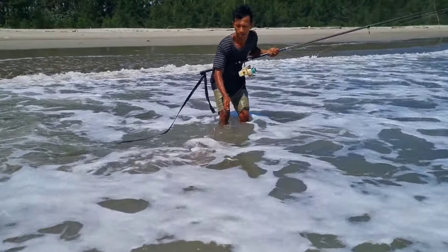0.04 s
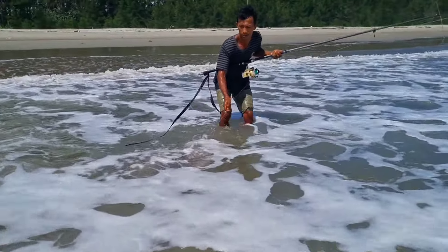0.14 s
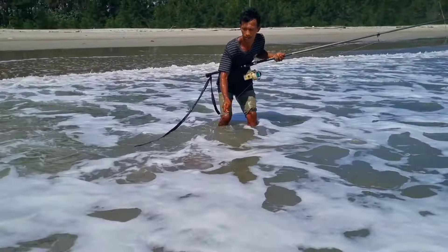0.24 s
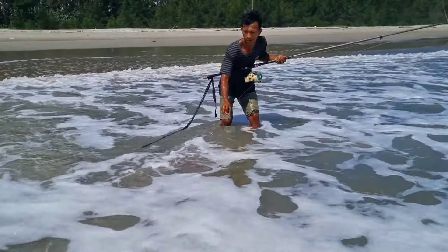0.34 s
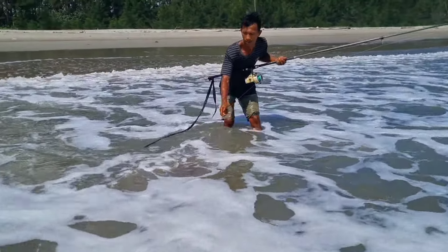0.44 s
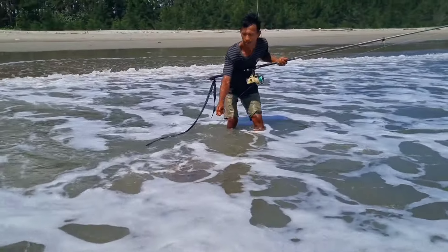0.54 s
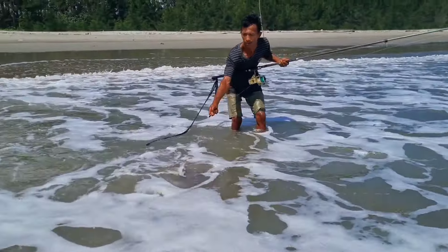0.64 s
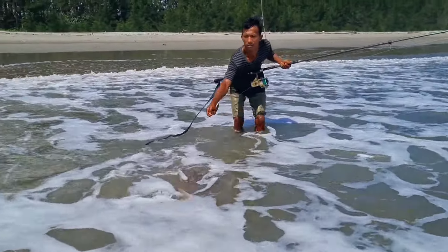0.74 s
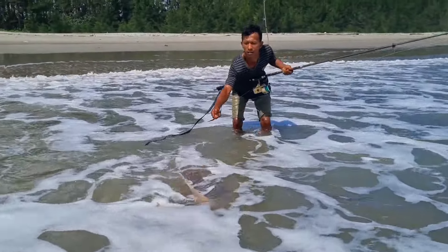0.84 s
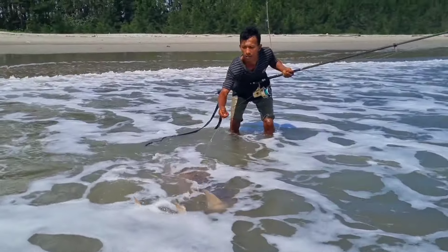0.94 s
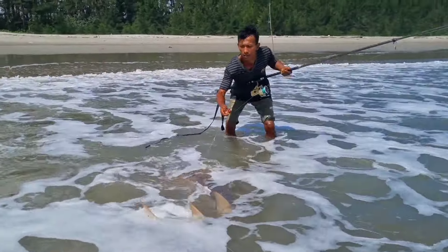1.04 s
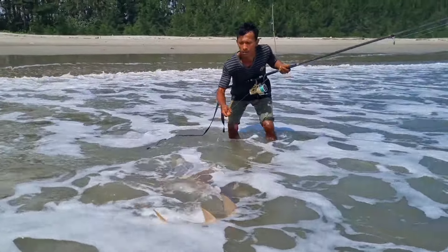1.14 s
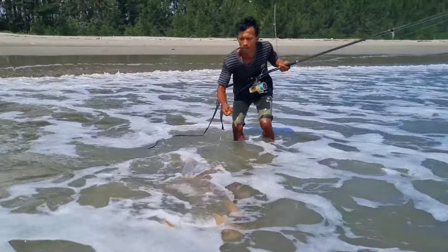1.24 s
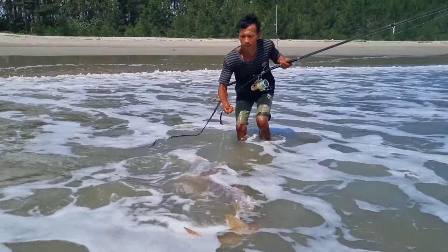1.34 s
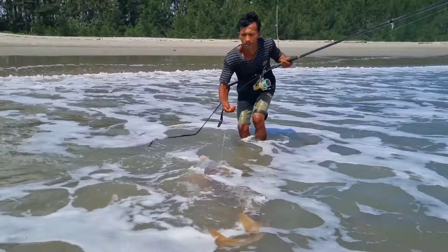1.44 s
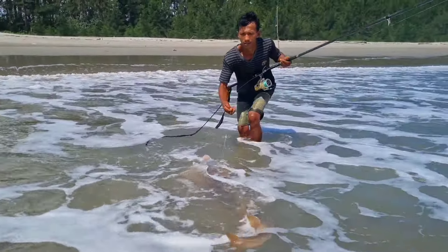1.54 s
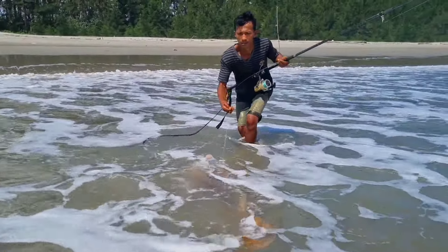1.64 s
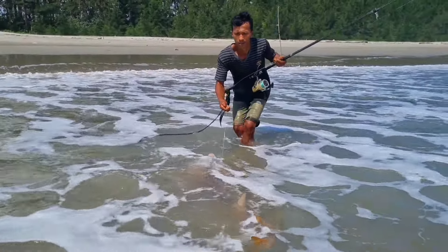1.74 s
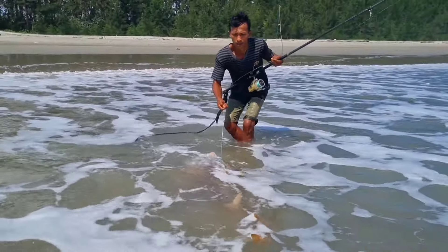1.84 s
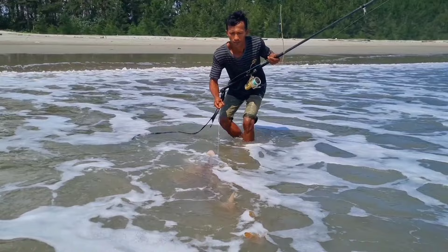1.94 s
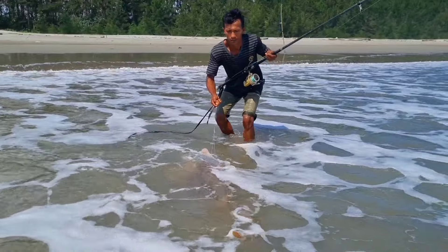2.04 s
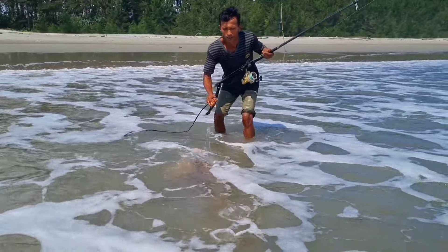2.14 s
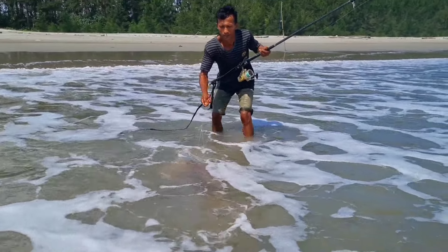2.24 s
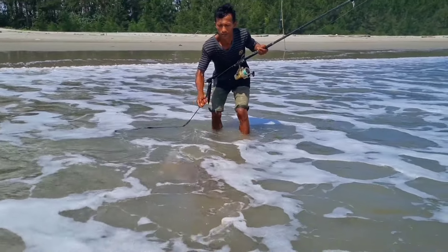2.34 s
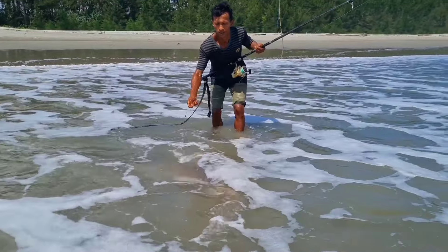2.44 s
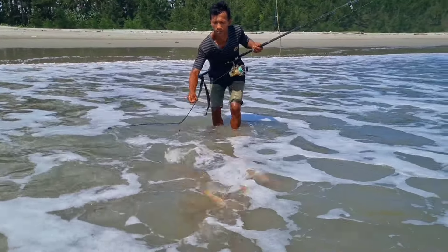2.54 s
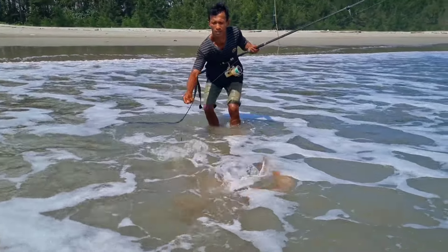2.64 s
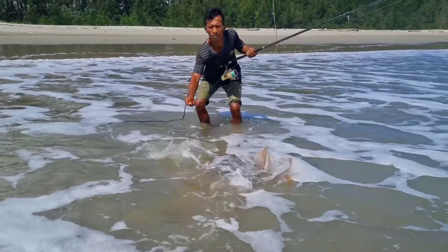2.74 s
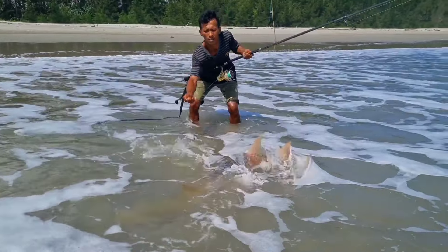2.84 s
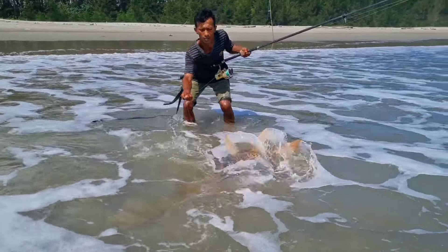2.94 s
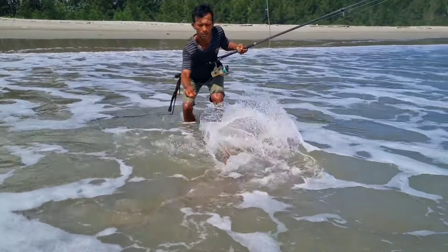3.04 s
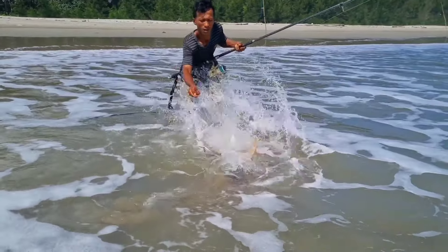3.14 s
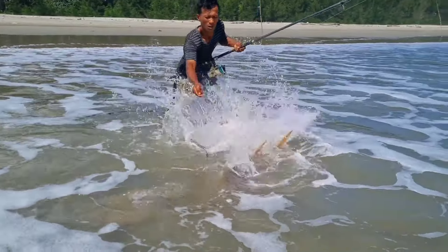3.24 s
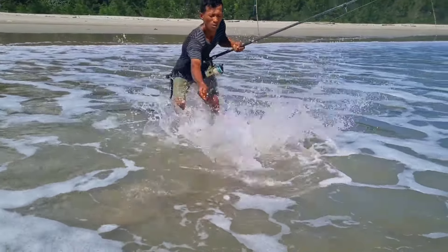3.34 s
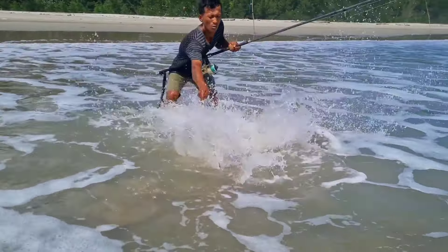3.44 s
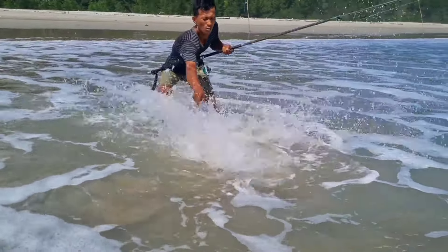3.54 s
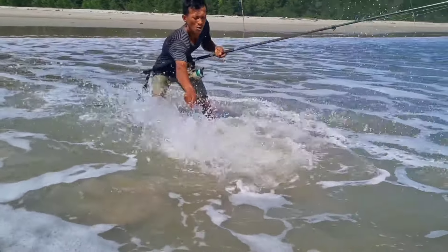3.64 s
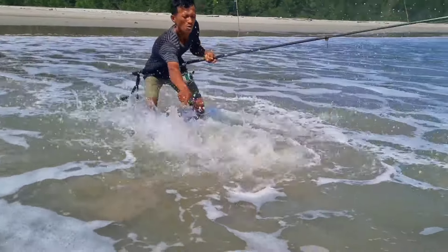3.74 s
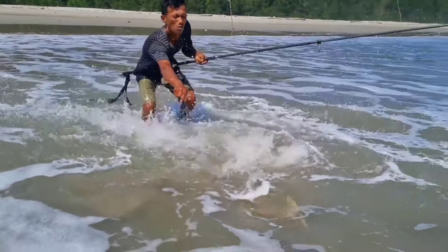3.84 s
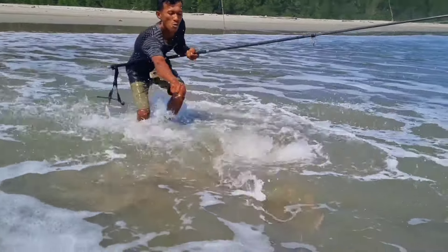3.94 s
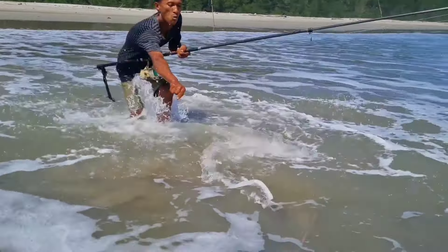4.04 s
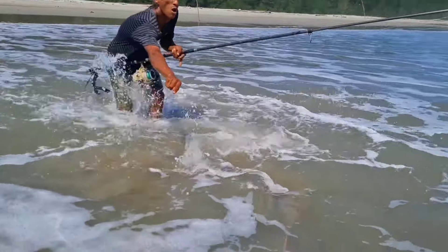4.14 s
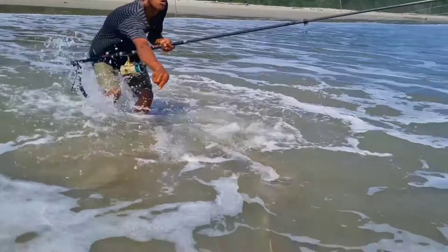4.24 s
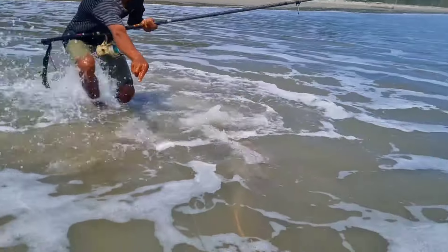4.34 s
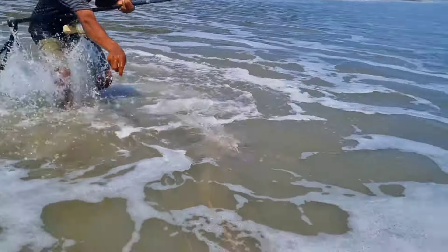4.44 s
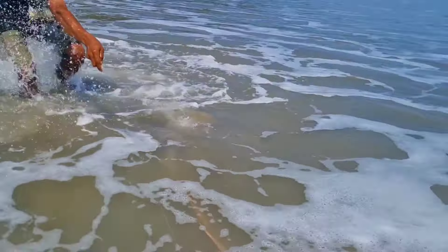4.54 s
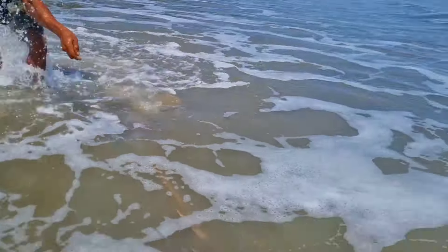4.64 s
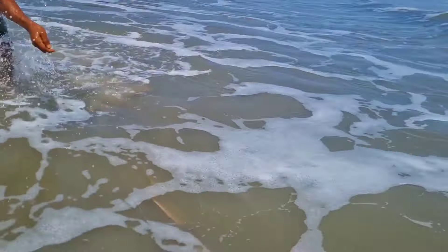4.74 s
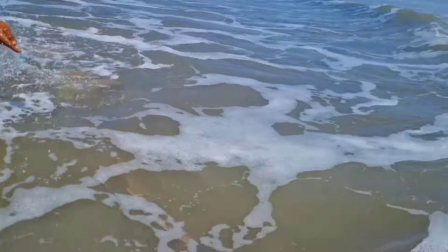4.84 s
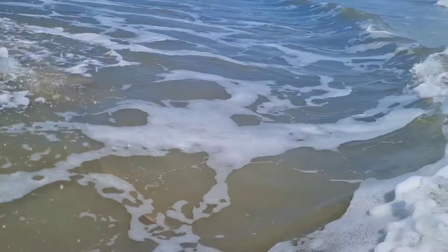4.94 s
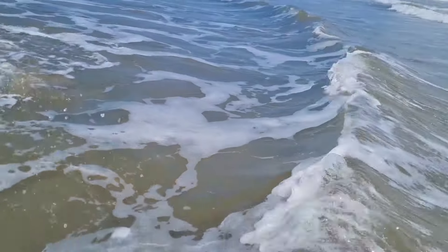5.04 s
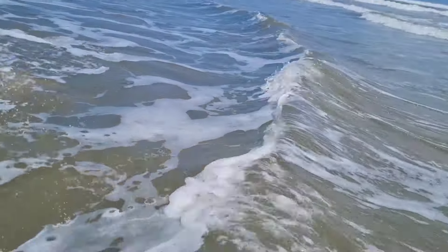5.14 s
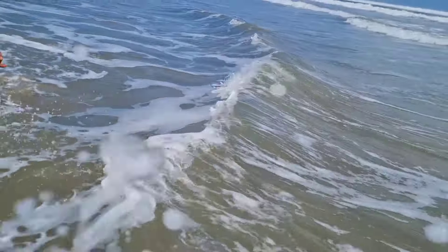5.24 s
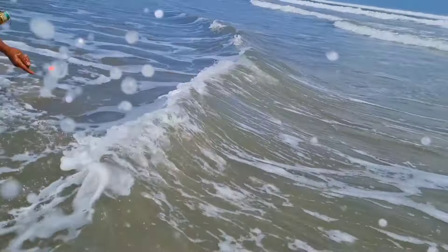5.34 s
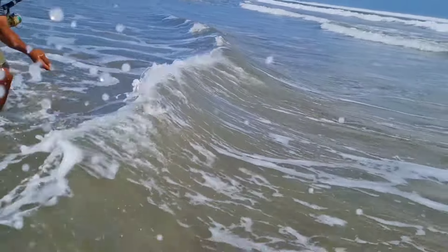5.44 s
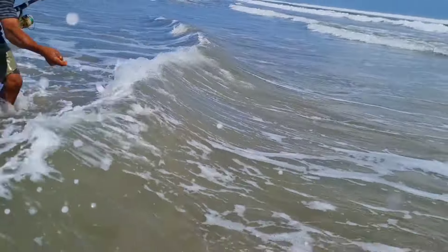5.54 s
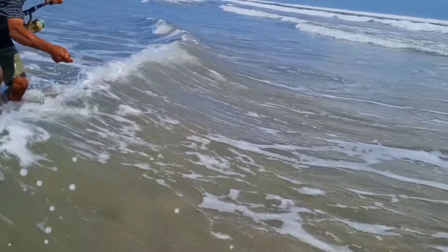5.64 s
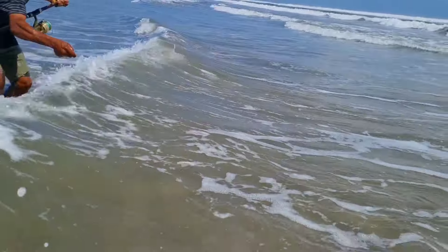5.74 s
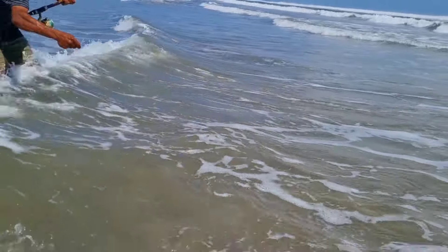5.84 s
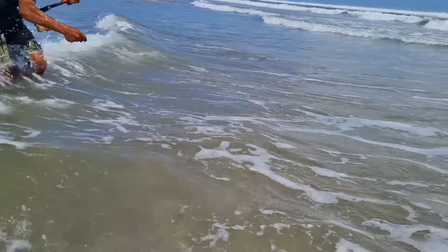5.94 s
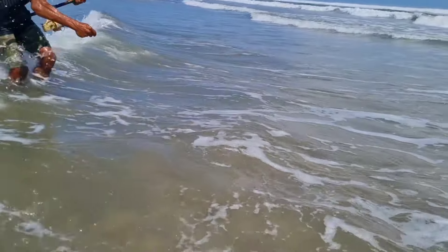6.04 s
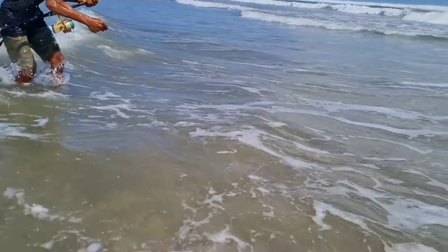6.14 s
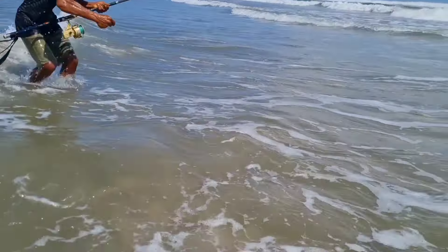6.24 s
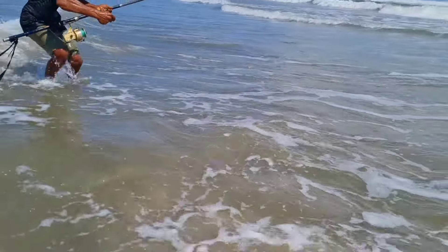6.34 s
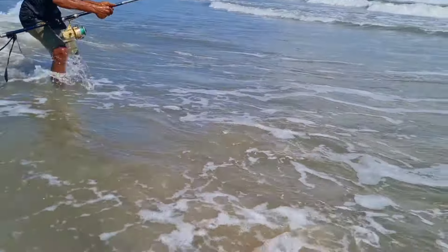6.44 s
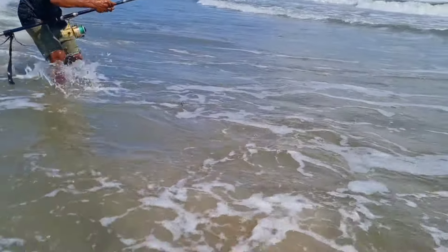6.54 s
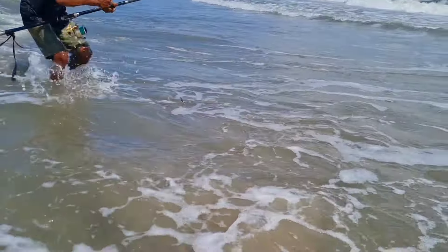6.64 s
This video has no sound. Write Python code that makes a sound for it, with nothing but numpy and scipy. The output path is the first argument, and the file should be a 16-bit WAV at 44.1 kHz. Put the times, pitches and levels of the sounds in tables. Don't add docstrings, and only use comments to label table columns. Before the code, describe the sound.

On an open beach, gusty wind rumbles and thuds on a close handheld stereo microphone over the low roar of distant breakers and fizzing foam. A few watery glugs come early, then a lull of mostly wind. From about three seconds a big fish thrashes nearby with splashes, plops and hissing spray, growing denser and closer to the end.

```python
import sys
import numpy as np
from scipy import signal
from scipy.fft import rfft, irfft, next_fast_len
from scipy.io import wavfile
from scipy.ndimage import uniform_filter1d, map_coordinates

SR = 44100
rng = np.random.default_rng(int(sys.argv[2]) if len(sys.argv) > 2 else 0)


def file_out(sig):
    cols = np.atleast_2d(sig).T
    lim = np.clip(cols, -1, 1)
    pcm = np.round(lim * 32767).astype(np.int16)
    wavfile.write(sys.argv[1], SR, pcm)


def makeup_ratio(level_db):
    decades = np.asarray(level_db, float) / 20
    return 10 ** decades


N = 294625


def rms_one(x):
    return x / np.sqrt(np.mean(x ** 2) + 1e-20)


def in_time(rows):
    s, *columns = np.transpose(rows)
    return [np.interp(np.arange(N) / SR, s, c) for c in columns]


def drift(rate_hz):
    step = 40
    r = np.exp(-2 * np.pi * rate_hz * step / SR)
    coarse = rng.standard_normal(N // step + 2002)
    slow = signal.lfilter([1], [1, -2 * r, r * r], coarse)[2000:]
    return np.interp(np.arange(N) / step, np.arange(len(slow)), rms_one(slow))


def patchy_noise(colour, shared_db, own_db, shared_hz, own_hz):
    size = next_fast_len(N, True)
    hz = np.maximum(np.arange(size // 2 + 1) * SR / size, 1)
    points = np.array(colour)
    shape = makeup_ratio(np.interp(np.log(hz), np.log(points[:, 0]), points[:, 1], left=-90))
    white = rng.standard_normal(len(hz)) + 1j * rng.standard_normal(len(hz))
    together = shared_db * drift(shared_hz)
    out = 0
    for centre in np.arange(np.log2(points[0, 0]), np.log2(points[-1, 0]) + 1, 0.5):
        share = np.clip(1 - 2 * abs(np.log2(hz) - centre), 0, 1)
        band = irfft(white * shape * share, size)[:N]
        out = out + band * makeup_ratio(together + own_db * drift(own_hz))
    return rms_one(out)


def at_ports(x, gain, lag_s, apart):
    index = np.arange(N)
    half = lag_s * SR / 2
    pair = [map_coordinates(x, [index + side * half], order=3, mode="nearest") for side in (1, -1)]
    alone = [np.roll(x, 30011), np.roll(x, -25031)]
    apart = np.clip(apart, 0, 1)
    return gain * (np.sqrt(1 - apart) * np.array(pair) + np.sqrt(apart) * np.array(alone))


def bubbles(s, level_db, pitch_hz, cycles, rise, swell, size=1323):
    t = np.arange(size) / SR
    turns = pitch_hz[:, None] * t
    life = turns / np.reshape(np.maximum(cycles, 1), (-1, 1))
    shape = (1 - np.exp(-turns / swell)) * np.exp(-3 * life)
    waves = makeup_ratio(level_db)[:, None] * shape * np.sin(2 * np.pi * turns * (1 + rise * life))
    at = (s * SR).astype(int)[:, None] + np.arange(len(t))
    return np.bincount(at.ravel(), waves.ravel(), N + len(t))[:N]


def swarm(count, low_hz, high_hz, cycles, spread_db):
    when, size, pitch = rng.random((count, 3)).T
    level_db = -spread_db * np.log(np.maximum(size, 0.01))
    pitch_hz = low_hz * (high_hz / low_hz) ** pitch
    return rms_one(bubbles(when * N / SR, level_db, pitch_hz, cycles + 0 * when, rise=0.171, swell=0.29))


def surges(bed_db, s, hold_s, level_db, rise_s, fall_s):
    t = np.arange(0, N + 64, 64) / SR
    age = t - s[:, None]
    attack = np.clip(age / rise_s + 1, 0, 1)
    decay = np.exp(-np.maximum(age - hold_s[:, None], 0) / fall_s)
    power = np.sum((makeup_ratio(level_db)[:, None] * attack * decay) ** 2, axis=0)
    return 10 * np.log10(makeup_ratio(bed_db) ** 2 + np.interp(np.arange(N) / SR, t, power))


# time_s, level_db
STEADY_WIND = [(0, -41), (.5, -45), (1.2, -36.5), (2.4, -35.5), (2.75, -35.5), (3.4, -35), (3.6, -39),
               (4.4, -39), (5.1, -42.5), (5.9, -48), (6.68, -47)]
# start_s, hold_s, level_db
GUSTS = [(0.165, 0.026, -48), (0.297, 0.048, -35.5), (0.38, 0.027, -31), (0.546, 0.13, -32.5),
         (0.925, .12, -42), (1.496, 0.054, -41), (1.813, 0.21, -34.5), (2.016, 0.039, -30),
         (2.227, .03, -32), (2.403, 0.23, -34.5), (2.8, 0.023, -31), (2.956, 0.042, -30.5),
         (3.133, 0.063, -40), (3.28, 0.23, -34.5), (3.68, 0.034, -31), (3.95, 0.027, -31.5),
         (4.05, 0.055, -33), (4.175, 0.026, -37), (4.297, 0.084, -35.5), (4.503, 0.027, -34),
         (4.666, .04, -39), (5.02, 0.082, -47), (5.807, 0.13, -49), (6.196, .08, -49)]
# frequency_hz, level_db
WIND_COLOUR = [(15, -37), (25, -4.5), (59, -3.5), (130, -0.5), (200, -5), (760, -20.5), (1200, -36),
               (3000, -70)]


def wind():
    level_db = surges(*in_time(STEADY_WIND), *np.transpose(GUSTS), rise_s=0.011, fall_s=0.039)
    buffeting = [patchy_noise(WIND_COLOUR, shared_db=3.5, own_db=2.5, shared_hz=9.5, own_hz=29.0)
                 for port in range(2)]
    return makeup_ratio(level_db + 3) * np.array(buffeting)


# start_s, level_db, pitch_hz, left_over_right_db
EDDIES = [(0.659, -30, 55, 2), (1.261, -31, 116, -1), (1.536, -29, 73, 3), (1.85, -28, 147, 6),
          (2.533, -27, 80, -4), (2.584, -26, 141, -1), (3.202, -26, 92, -2), (3.266, -27, 73, 0),
          (3.341, -22, 66.4, 0), (3.416, -29, 153, -1), (3.752, -28.5, 141, 3), (3.849, -34, 61, 0),
          (4.064, -32, 147, 0), (4.295, -30, 67, -3), (4.52, -30, 116, 0), (4.685, -28, 129, -1),
          (5.304, -27, 92, 1), (5.58, -27, 153, -1), (5.894, -28, 122, 0), (6.207, -29, 61, -1),
          (6.236, -28.5, 122, 2), (6.334, -29, 141, 0)]


def eddies():
    s, level_db, pitch_hz, pan_db = np.transpose(EDDIES)
    ports = [bubbles(s, level_db + 4.5 + side * pan_db / 2, pitch_hz, 5.3, rise=0.0089, swell=0.7, size=4400)
             for side in (1, -1)]
    return np.array(ports)


# time_s, roar_db, wash_db
BREAKERS = [(0.0, -29.5, -44), (0.32, -34.5, -37.5), (0.76, -29.5, -38), (1.36, -31, -40.5),
            (1.75, -33, -43.5), (3.07, -27, -37), (3.35, -29.5, -35), (3.63, -27, -40), (4.02, -29.5, -35),
            (4.52, -31, -38), (4.93, -29, -49), (5.43, -35, -54), (5.78, -28.5, -31.5), (6.44, -28.5, -36),
            (6.68, -35, -32)]
# frequency_hz, level_db
ROAR_COLOUR = [(30, -33), (100, -8.5), (190, -20), (250, -3.5), (370, -1.5), (760, -12), (1100, -21.5),
               (2000, -36.5)]
# frequency_hz, level_db
WASH_COLOUR = [(600, -35), (1100, 5), (2500, 2.5), (3300, -3.5), (6000, -25.5), (15500, -6.5)]


def breakers():
    roar_db, wash_db = in_time(BREAKERS)
    roar = patchy_noise(ROAR_COLOUR, shared_db=1.5, own_db=2.0, shared_hz=4.1, own_hz=11.7)
    wash = patchy_noise(WASH_COLOUR, shared_db=1.5, own_db=1.8, shared_hz=8, own_hz=25)
    lag_s = -0.00045
    far = at_ports(roar, makeup_ratio(roar_db), lag_s, apart=0.12)
    return far + at_ports(wash, makeup_ratio(wash_db - 7.0), lag_s, apart=0.22)


# time_s, stirring_db, foam_cover_db
NEAR_WATER = [(0, -49, -53), (.33, -45.5, -50.5), (.74, -45.5, -49.5), (1.5, -47.5, -51.5),
              (1.64, -56, -59), (1.88, -61, -56), (2.0, -53.5, -54.5), (2.55, -53.5, -51.5),
              (2.7, -62, -49.5), (3.05, -42, -50.5), (3.4, -38, -49.5), (3.95, -39.5, -48.5),
              (4.1, -42.5, -54), (4.55, -38, -50), (4.68, -31.5, -44), (5.3, -35.5, -46.5),
              (5.9, -34, -43.5), (6.05, -35.5, -48), (6.68, -37, -46)]
# start_s, hold_s, strength_db
HEAVES = [(0.722, 0.021, -23), (0.9, 0.23, -20), (1.2, 0.073, -35), (1.92, 0.08, -31), (2.185, 0.11, -45),
          (2.587, 0.06, -46), (2.813, 0.14, -28.5), (3.092, 0.11, -26.5), (3.29, 0.032, -27),
          (3.628, 0.092, -25), (3.775, 0.079, -31.5), (4.287, 0.088, -24), (4.482, 0.066, -20),
          (4.617, 0.096, -22.5), (4.802, 0.11, -23), (4.977, 0.073, -28), (5.06, 0.09, -23.5),
          (5.213, 0.069, -25.5), (5.44, 0.027, -30), (5.517, 0.04, -23), (5.632, 0.037, -39),
          (5.814, 0.027, -26.5), (6.004, .03, -33), (6.093, 0.11, -21), (6.35, 0.071, -28.5),
          (6.477, .05, -24.5), (6.593, 0.025, -26.5)]
# start_s, hold_s, strength_db, slap_weight_db
THROWS = [(0.177, 0.022, -46, 3), (0.295, 0.11, -47.5, 3), (0.606, 0.14, -44, -9), (2.597, 0.23, -49.5, 4),
          (2.946, .03, -66, 18), (3.103, 0.039, -37.5, 9), (3.295, 0.037, -40, 7.5),
          (3.41, 0.013, -39.5, -1), (3.468, 0.021, -44, -1), (3.624, 0.048, -43, 9.5),
          (3.87, 0.041, -43.5, 0), (4.095, 0.021, -43, 6.5), (4.153, 0.022, -44, 4),
          (4.244, .015, -41.5, 4.5), (4.307, 0.038, -40, 6), (4.44, 0.051, -40.5, 7),
          (4.636, .08, -52, 12.5), (4.79, 0.011, -46, 9), (4.856, 0.013, -49.5, 15.5),
          (4.9, 0.032, -41, -1), (5.079, 0.067, -36.5, 1), (5.253, .02, -39, 6), (5.386, 0.045, -40, -1),
          (5.502, 0.094, -47, 6), (5.546, 0.061, -33.5, 2), (5.72, 0.046, -45, -7), (5.816, 0.046, -39, 3),
          (5.935, .05, -39, -1), (6.18, 0.12, -38.5, 2), (6.455, 0.084, -42.5, 7)]


def water_levels():
    stir_db, cover_db = in_time(NEAR_WATER)
    s, hold_s, throw_db, slap_db = np.transpose(THROWS)
    rise_s, fall_s = 0.01, 0.028
    churn_bed_db = -32 + 0.15 * (stir_db + 40)
    spray_bed_db = -45.5 + (stir_db + 40)
    froth_db = -49.5 + 0.91 * (throw_db + 40)
    churn_db = surges(churn_bed_db, *np.transpose(HEAVES), rise_s=0.0097, fall_s=0.031)
    splash_db = surges(stir_db, s, hold_s, throw_db + slap_db, rise_s, fall_s)
    spray_db = surges(spray_bed_db, s, hold_s, throw_db, rise_s, fall_s)
    foam_db = surges(cover_db, s, hold_s, froth_db, rise_s, fall_s)
    return churn_db, splash_db, spray_db, foam_db


# frequency_hz, level_db
FOAM_COLOUR = [(1000, -21), (2500, 0), (4700, -0.5), (9000, -3), (12200, -1), (15500, -4.5)]


def foam():
    foam_db = water_levels()[3] + 0.8 * drift(20)
    hiss = [patchy_noise(FOAM_COLOUR, shared_db=0.4, own_db=1.0, shared_hz=40, own_hz=12)
            for port in range(2)]
    fizz = [swarm(count=1500, low_hz=4000, high_hz=13500, cycles=29.0, spread_db=3.5) for port in range(2)]
    return makeup_ratio(foam_db + 6.0) * (np.array(hiss) + makeup_ratio(-11.0) * np.array(fizz))


# time_s, right_port_lag_ms, near_share_of_churn_db
BEARING = [
    (0, 0.088, -9),
    (1, 0.0069, -17),
    (2.5, 0.018, 0.5),
    (3.1, -0.0011, -7),
    (3.7, 0.053, -1),
    (4.5, -0.15, -7.5),
    (5, 0.06, 0.5),
    (5.8, .11, 2),
    (6.3, 0.026, -6),
    (6.68, 0.12, 2.5),
]


def bearing():
    lag_ms, near_db = in_time(BEARING)
    return lag_ms / 1000, near_db


# frequency_hz, level_db
SPRAY_COLOUR = [(1200, 5), (2000, -13), (3000, 2.5), (4500, -9.5), (7000, -10), (15500, -29)]


def spray():
    spray_db = water_levels()[2]
    lag_s, near_db = bearing()
    droplets = swarm(count=2600, low_hz=1700, high_hz=5000, cycles=24.0, spread_db=3.5)
    patter = patchy_noise(SPRAY_COLOUR, shared_db=5.5, own_db=3.5, shared_hz=25, own_hz=16)
    fall = patter + makeup_ratio(-0.5) * droplets
    return at_ports(fall, makeup_ratio(spray_db - 3.5 + 0.14 * near_db), lag_s, apart=0.99)


# start_s, level_db, pitch_hz
PLOPS = [(.3691, -22, 1660), (2.6295, -23, 1250), (2.9572, -17, 1135), (3.114, -13.5, 1060),
         (3.3094, -16, 910), (3.437, -23, 1690), (3.5853, -16.5, 880), (3.6352, -18, 1030),
         (4.316, -15, 900), (4.347, -17, 1360), (4.6444, -19, 1040), (4.665, -16, 1040),
         (4.6887, -20, 1190), (4.7132, -21, 1350), (4.8557, -4, 945), (4.9332, -15, 1000),
         (4.9866, -16, 1170), (5.009, -12, 905), (5.2415, -19, 1470), (5.2634, -13, 1034),
         (5.386, -14.5, 1030), (5.495, -14, 1280), (5.5224, -13, 940), (5.564, -16, 931),
         (5.8094, -14, 990), (5.97, -17, 1380), (6.172, -18, 1320), (6.2034, -11, 1090),
         (6.2305, -22, 1050), (6.5, -16, 1020),
         (.2384, -28, 1450), (0.292, -27, 2250), (0.591, -30, 1360), (.6936, -24, 1750), (0.719, -26, 1870),
         (.826, -31, 1860), (2.796, -29, 1300), (3.003, -31, 1500), (2.9605, -25, 1420),
         (3.4905, -24, 1400), (4.097, -26, 1370), (4.125, -23, 1250), (4.1777, -20, 1700),
         (4.2462, -26, 1300)]
# start_s, level_db, pitch_hz
DROPS = [(0.924, -36, 3358), (2.616, -35, 1754), (2.635, -31, 1303), (3.115, -41, 3157), (3.309, -36, 3257),
         (3.31, -27, 2490), (3.33, -34, 1854), (3.358, -30, 1453), (3.444, -30, 2756), (3.465, -33, 1253),
         (3.491, -29, 2756), (3.645, -29, 1604), (3.652, -37, 3157), (4.095, -27, 2456), (4.107, -38, 2556),
         (4.126, -31, 2040), (4.157, -39, 3408), (4.519, -34, 2806), (4.519, -28, 1854), (4.661, -32, 2155),
         (4.672, -27, 1453), (4.801, -23, 1654), (4.841, -29, 1754), (4.88, -36, 2005), (5.121, -27, 2105),
         (5.546, -29, 1654), (5.6, -33, 2355), (5.627, -30, 2005), (5.843, -31, 1804), (5.893, -28, 2255),
         (5.933, -33, 2856), (5.978, -30, 2556), (6.119, -28, 1400), (6.126, -27, 1403), (6.185, -36, 3007),
         (6.187, -34, 3608), (6.201, -31, 2405), (6.206, -36, 4159), (6.298, -30, 2556), (6.338, -31, 2255),
         (6.466, -27, 1490), (6.501, -29, 2506), (6.509, -32, 2005)]
# start_s, level_db, pitch_hz
TICKS = [(.1805, -34, 4970), (.7282, -29, 5370), (3.2962, -37, 3030), (3.436, -28, 2770),
         (3.4762, -35, 3000), (3.5872, -40, 3040), (3.6461, -32, 3330), (3.903, -36, 3660),
         (4.127, -35, 4450), (4.3151, -32, 4140), (4.9468, -28, 3340), (6.183, -34, 3610),
         (6.2781, -26, 6820), (6.36, -33, 3820), (6.5345, -28, 3600)]


def plops_and_drops():
    drops = makeup_ratio(5) * bubbles(*np.transpose(DROPS), cycles=13.4, rise=0.03, swell=0.4)
    plops = makeup_ratio(-5.0) * bubbles(*np.transpose(PLOPS), cycles=18.2, rise=0.032, swell=0.24)
    ticks = makeup_ratio(9) * bubbles(*np.transpose(TICKS), cycles=8, rise=0.019, swell=0.24)
    return drops + plops + ticks


# start_s, level_db, pitch_hz, decay_cycles
GLUGS = [(.318, -9, 370, 3.8), (0.38, -9.5, 270, 5.4), (0.724, 3, 306, 2.4), (0.806, -7, 333, 4.4),
         (1.928, -7, 268, 3.3), (2.193, -8.5, 404, 10), (2.307, -7.5, 420, 5.4), (2.345, -10, 305, 8.3),
         (2.975, -8, 330, 9.1), (3.058, -6, 372, 8.9), (3.115, -9, 510, 26), (3.306, -5, 440, 5.6),
         (3.643, 4, 487, 8.7), (4.295, -9.5, 355, 14), (4.746, -11, 537, 23), (4.796, 1, 258, 5.6),
         (4.872, -6.5, 374, 19), (5.069, -7, 443, 35), (5.096, 2, 460, 4.9), (5.224, -6, 333, 4.2),
         (5.248, -1, 298, 4.2), (5.434, -1.5, 412, 5), (5.45, 5, 236, 2.5), (5.527, -8, 400, 15),
         (5.654, 6, 407, 3.5), (5.84, 9.5, 258, 3.6), (6.013, -2, 327, 4.4), (6.106, -7, 326, 7.6),
         (6.471, 6.5, 410, 3.6), (6.498, -2, 349, 6.3)]
# start_s, level_db, pitch_hz
GULPS = [(0.079, -25, 268), (0.115, -24, 282), (0.164, -26, 410), (0.321, -24, 520), (0.56, -23, 297),
         (0.865, -21.5, 284), (0.959, -20, 362), (1.005, -20, 299), (1.125, -22, 434), (1.749, -26.5, 236),
         (1.928, -24, 270), (2.078, -24, 284), (2.099, -23, 270), (2.394, -19, 297), (2.639, -25, 252),
         (2.812, -18, 299), (2.932, -19, 313), (3.162, -17.5, 331), (3.238, -23, 299), (3.306, -20, 362),
         (3.615, -19, 474), (3.67, -17, 516), (3.852, -22, 515), (4.057, -23.5, 441), (4.122, -21, 362),
         (4.312, -23, 375), (4.36, -24, 266), (4.473, -22, 425), (4.552, -16, 284), (4.604, -19, 331),
         (4.657, -19, 312), (4.712, -17, 284), (4.995, -17, 346), (5.035, -17, 457), (5.09, -21, 252),
         (5.226, -14, 346), (5.294, -17.5, 284), (5.595, -24, 252), (5.742, -21, 296), (5.805, -19, 299),
         (6.012, -17, 331), (6.106, -14, 362), (6.14, -19, 270), (6.628, -22, 520)]
# start_s, level_db, pitch_hz
POPS = [(0.353, -41, 970), (0.404, -34, 750), (0.865, -34, 706), (1.208, -36, 904), (1.731, -32, 728),
        (1.87, -33, 617), (2.474, -28, 728), (2.928, -30, 750), (3.325, -23, 546), (3.378, -23, 710),
        (3.402, -26, 904), (3.531, -33, 816), (3.796, -23, 639), (4.29, -28, 992), (4.347, -30, 880),
        (4.416, -27, 926), (4.458, -23, 805), (4.532, -25, 750), (4.573, -24, 772), (4.666, -26, 794),
        (4.691, -21, 816), (4.714, -26, 620), (4.869, -16, 750), (5.092, -20, 750), (5.199, -22, 794),
        (5.259, -22, 543), (5.348, -25, 533), (5.594, -21, 660), (5.637, -22, 830), (5.676, -24, 665),
        (5.783, -26, 780), (5.983, -30, 728), (6.135, -22, 904), (6.161, -18, 662), (6.291, -30, 838),
        (6.34, -31, 750), (6.621, -22, 760), (6.625, -20, 529)]


def air_pockets():
    glugs = makeup_ratio(-6.5) * bubbles(*np.transpose(GLUGS), rise=0.08, swell=0.7, size=3000)
    gulps = makeup_ratio(4) * bubbles(*np.transpose(GULPS), cycles=6.8, rise=0.043, swell=0.68, size=2000)
    pops = makeup_ratio(4.5) * bubbles(*np.transpose(POPS), cycles=10.3, rise=0.038, swell=0.52)
    return glugs + gulps + pops


# frequency_hz, level_db
SLOSH_COLOUR = [(25, -21), (55, 4), (110, -4), (180, -0.5), (260, -17)]
# frequency_hz, level_db
SPLASH_COLOUR = [(300, -0.5), (600, -11.5), (1050, -8), (1700, -15), (2400, -18), (4500, -38.5)]


def thrashing():
    churn_db, splash_db = water_levels()[:2]
    lag_s, near_db = bearing()
    large = swarm(count=4000, low_hz=210, high_hz=680, cycles=7.0, spread_db=2.2)
    slosh = patchy_noise(SLOSH_COLOUR, shared_db=2.0, own_db=2.0, shared_hz=25, own_hz=12)
    churn = large + makeup_ratio(-12.0) * slosh
    gurgle = swarm(count=2600, low_hz=600, high_hz=2000, cycles=16.0, spread_db=3.0)
    rush = patchy_noise(SPLASH_COLOUR, shared_db=3.5, own_db=4.0, shared_hz=26.0, own_hz=12.6)
    splash = rush + makeup_ratio(1.5) * gurgle
    singles = air_pockets() + plops_and_drops()
    near = at_ports(churn, makeup_ratio(churn_db + near_db), lag_s, apart=0.1)
    near += at_ports(splash, makeup_ratio(splash_db + 0.4 * near_db), lag_s, apart=0.4)
    return near + at_ports(singles, 0.92, lag_s, apart=0)


def scene():
    return wind() + eddies() + breakers() + foam() + spray() + thrashing()


def low_pass(x):
    return signal.sosfilt(signal.butter(12, 16340, fs=SR, output="sos"), x)


def record(dry):
    top_band_hz, cutoff_hz = 15160, 15520
    dry = signal.sosfilt(signal.butter(2, 30, "high", fs=SR, output="sos"), dry)
    hz = np.arange(N // 2 + 1) * SR / N
    spectrum = rfft(dry)
    body = irfft(spectrum * (hz < top_band_hz), N)
    top = irfft(spectrum * ((hz >= top_band_hz) & (hz < cutoff_hz)), N)
    starved = drift(9) + 0.25 * np.arange(N) / SR > 0.6
    kept = uniform_filter1d(1.0 - starved, size=512)
    return low_pass(body + top * kept)


dry = scene()
out = record(dry)
file_out(out)
```